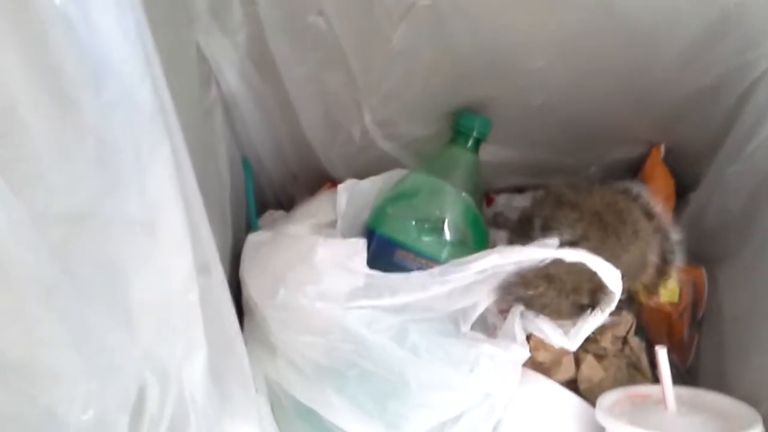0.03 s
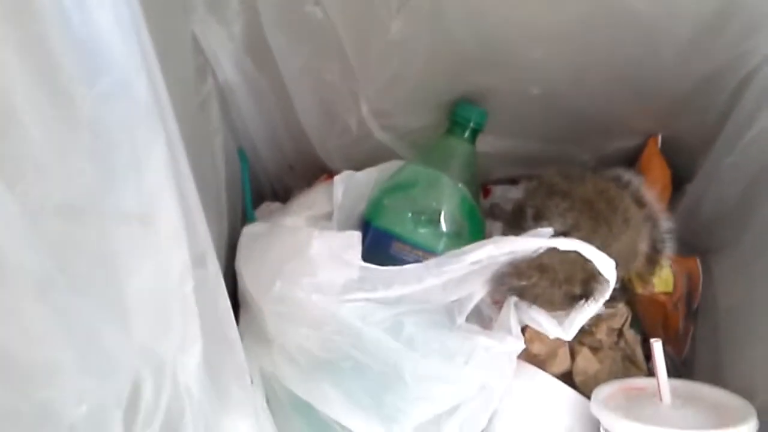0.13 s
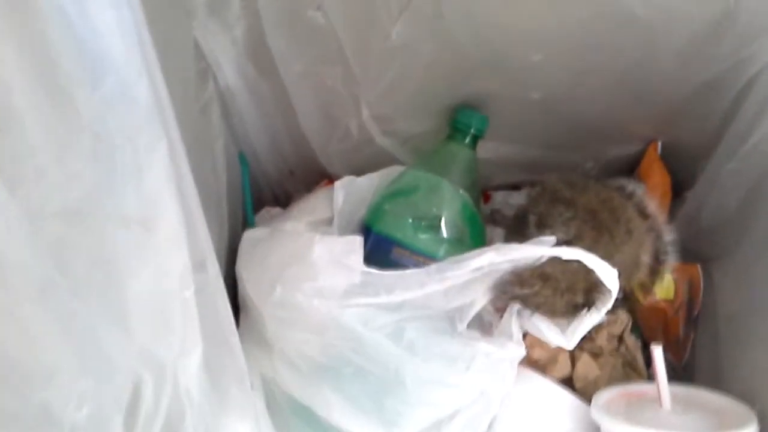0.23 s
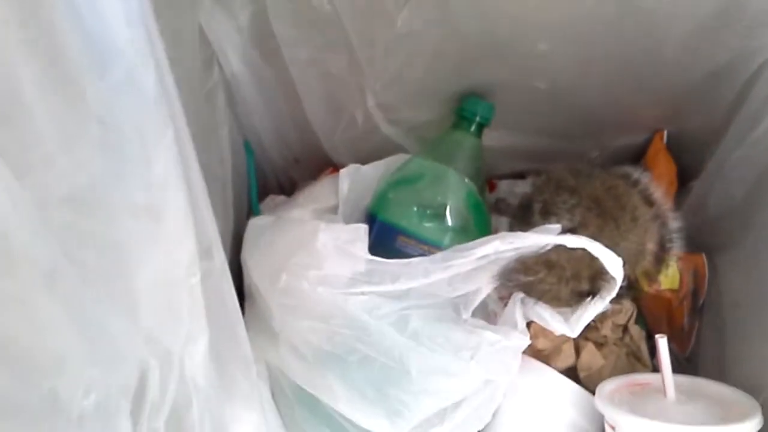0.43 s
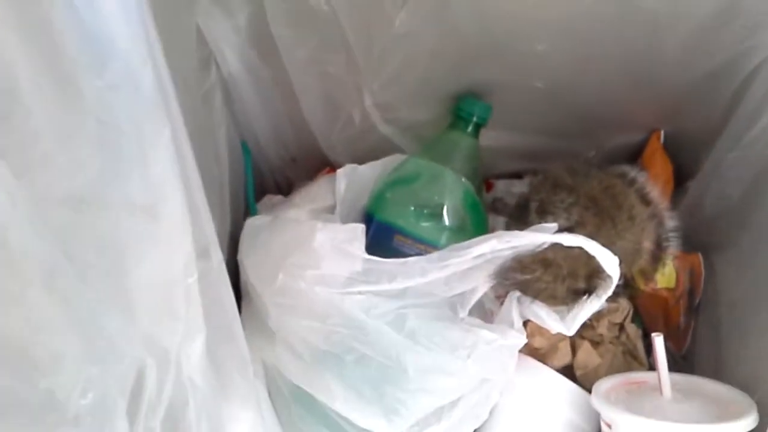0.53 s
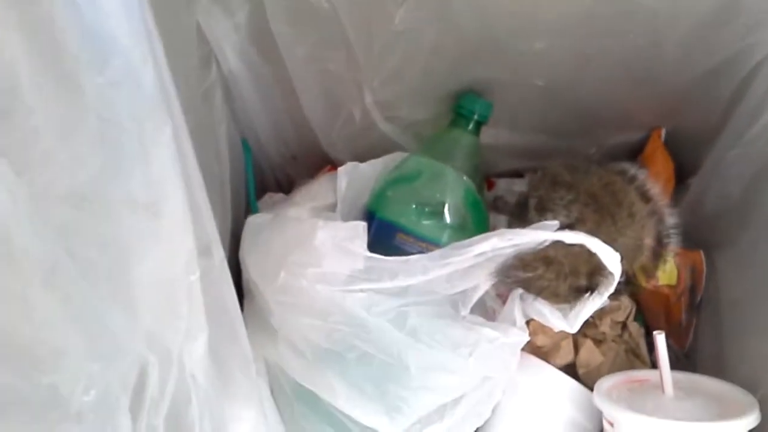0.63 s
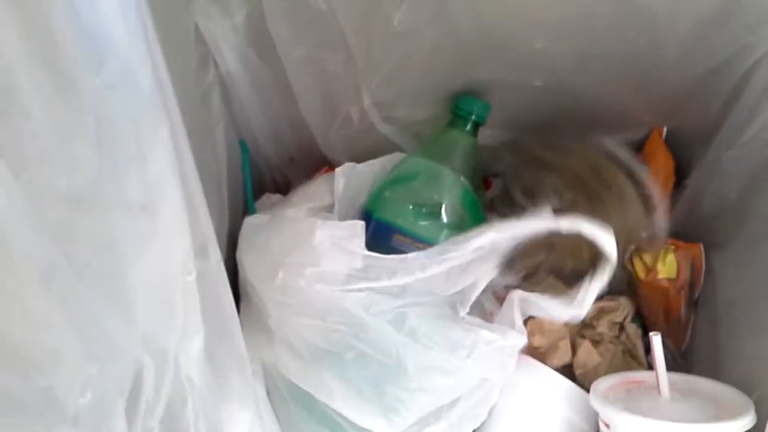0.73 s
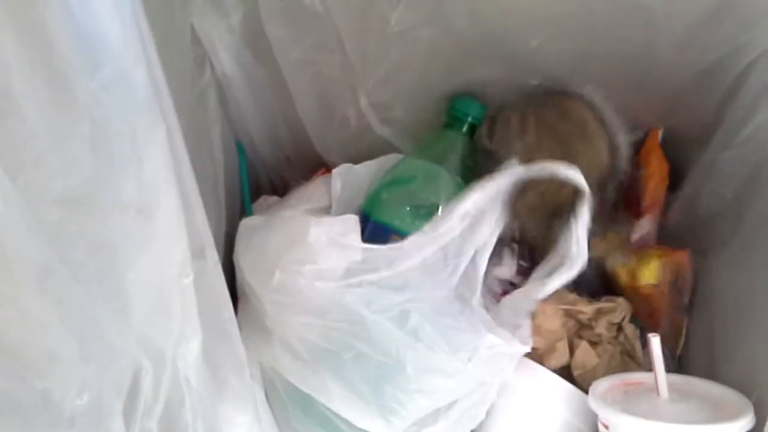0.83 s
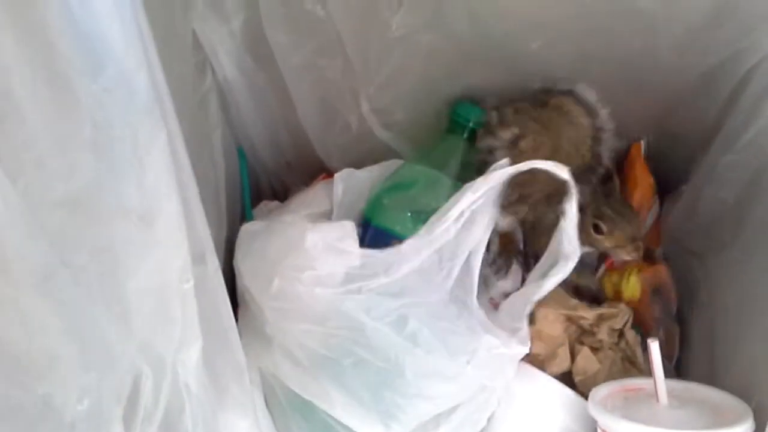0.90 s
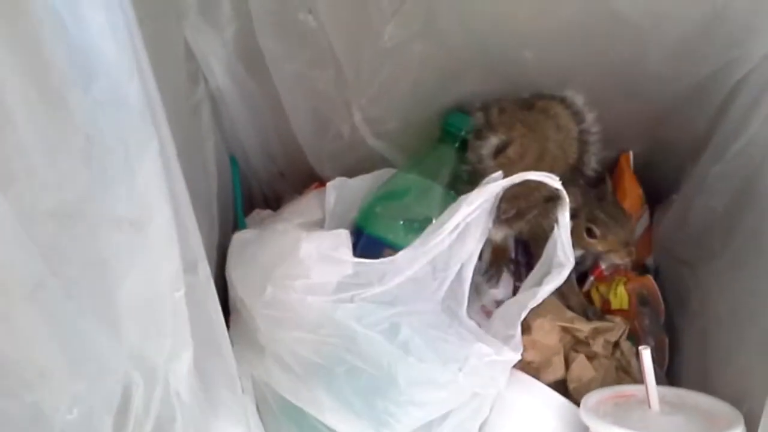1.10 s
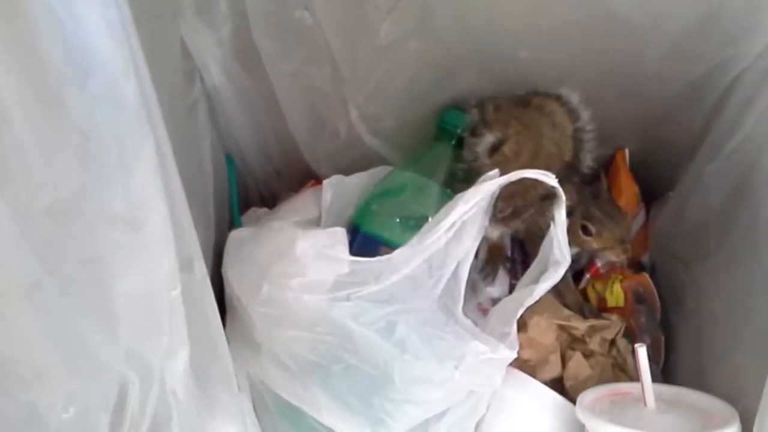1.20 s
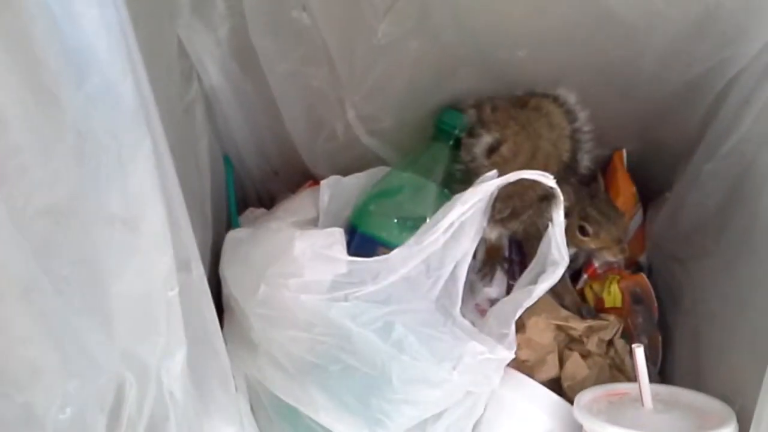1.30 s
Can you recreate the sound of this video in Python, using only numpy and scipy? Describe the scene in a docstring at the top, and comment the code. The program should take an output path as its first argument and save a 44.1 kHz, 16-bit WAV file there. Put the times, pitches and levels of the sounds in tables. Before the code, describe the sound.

Trash knocks in a bin, then ticks and plastic bag crinkling as a squirrel rummages.

```python
"""A squirrel rummaging in a lined rubbish bin, outdoors; one microphone just above the rim.
After a few faint taps, trash drops against the bin with a clattering knock that overloads the microphone.
Claws and settling scraps tick on the hard plastic. Then the animal climbs through a thin plastic bag,
whose creases crinkle and folds snap; two faint squeaks sound as the rustle dies.
Throughout, the bin's hollow colours everything, over faint outdoor noise."""
import sys
import numpy as np
from scipy import signal
from scipy.fft import rfft, irfft
from scipy.io import wavfile

SR = 44100
rng = np.random.default_rng(int(sys.argv[2]) if len(sys.argv) > 2 else 0)


def inscribe(sig):
    """Save sig as 16-bit PCM at rate SR to the path in sys.argv[1].

    A 1-D sig is mono; a 2-D sig holds one channel per row.
    Samples are clipped to [-1, 1] before scaling.
    """
    pcm = np.round(np.clip(np.atleast_2d(sig).T, -1, 1) * 32767)
    wavfile.write(sys.argv[1], SR, pcm.astype(np.int16))


N = 59535
TIME_S = np.arange(N) / SR
BANDS_HZ = 31.25 * 2 ** (np.arange(28) / 3)


# blows of trash on the bin: start_s, boom_db, body_db, crack_db, splinter_db, ring_length_ratio
BLOWS = [(0.21, -13.5, -46, -64, -66, 0.88), (.218, -23, -21, -19, -22, .8),
         (0.2209, -5.5, -10.5, -14, -5.5, 0.72), (0.2261, -12.5, -5, -6, -8, 1.14),
         (.240, -18, -29, -18, -9, 0.76), (0.2528, -21, -26, -11, -9, 0.85),
         (0.2684, -15, -25, -46, -17, 0.7), (.280, -20, -17, -19, -25.5, 0.75),
         (0.31, -35, -52, -20, -37, 1.47), (.327, -26, -48, -48, -54, .9),
         (0.339, -17.5, -12.5, -35, -40, 0.46), (0.371, -19, -31.5, -43, -60, 0.61),
         (.401, -25.5, -27.5, -44.5, -46, 0.91)]
# tone of a blow: band_hz, level_db
BLOW_COLOUR = [(30, -39), (60, -22), (115, -1.5), (200, -5.5), (400, -5.5), (900, -2), (1800, 3),
               (2700, -4), (4400, -3), (7500, 0.5), (11000, -11.5), (16000, -19)]
# decay of its echoes: band_hz, t60_s
BLOW_DECAY = [(60, 0.64), (130, 0.15), (300, 0.36), (900, 0.23), (1700, 0.097), (2700, .17), (5000, 0.11),
              (14000, 0.1)]

def trash_knock():
    """Trash drops against the bin: a soft push, then a cluster of blows and damped bounces."""
    blows = np.array(BLOWS)
    return bin_hits(blows[:, :-1], (130, 900, 2600, 8000), BLOW_COLOUR, BLOW_DECAY,
                    attack_s=0.0014, ring_lengths=blows[:, -1])


# taps on hard plastic: start_s, hollow_db, body_db, snap_db, fizz_db, ring_pitch_hz, ring_db
TAPS = [(.046, -38, -53, -55, -48, 167.3, -29.5), (.097, -38.5, -50, -52, -45, 114.3, -34.5),
        (0.1512, -76, -38.5, -41.5, -36, 4100, -42), (.174, -44, -54, -43, -37, 4200, -43),
        (.196, -52, -65, -54, -37, 4100, -38), (.434, -29, -39, -43, -50, 5600, -38.5),
        (0.444, -39, -32, -46, -55, 2700, -32), (0.5101, -32, -25, -28.5, -36, 4370, -26),
        (0.5787, -28, -32, -54, -34, 6800, -45), (0.6168, -45, -35, -31.5, -40, 5770, -32.5),
        (0.62, -53, -27, -70, -62, 972, -20.5), (0.6512, -37, -29, -44, -57, 6370, -44),
        (.806, -47, -56, -26.5, -50, 4150, -26), (0.836, -37.5, -42, -58, -46, 1515, -29),
        (0.924, -42, -56, -44, -44, 936, -29), (1.192, -52, -52, -45, -39, 1500, -45),
        (1.23, -54.5, -56, -54.5, -45, 7400, -66), (1.285, -78, -45, -47.5, -45, 2300, -50),
        (1.3315, -74, -56, -48, -47.5, 2930, -45)]
# tone of a tap: band_hz, level_db
TAP_COLOUR = [(30, -29), (100, -14.5), (250, -2), (900, 0), (1700, 2), (3000, 4.5), (8000, 5.5),
              (16000, -20.5)]
# decay of its echoes: band_hz, t60_s
TAP_DECAY = [(100, 1), (400, 0.26), (1000, 0.15), (2500, 0.098), (6000, 0.022), (14000, 0.11)]

def ticks():
    """Claws and scraps tap inside the bin; each tapped thing adds a short ring of its own."""
    attack_s, ring_width = 0.00089, 0.031  # width as a share of the pitch
    out = bin_hits([row[:5] for row in TAPS], (250, 1000, 4500, 10000), TAP_COLOUR, TAP_DECAY, attack_s)
    for start_s, *_, pitch_hz, ring_db in TAPS:
        resonance_db = lambda hz: -20 * np.log10(1 + ((hz / pitch_hz - 1) / ring_width) ** 2)
        ring = unit(shaped(rng.standard_normal(N), resonance_db))
        out += undb(ring_db) * ring * fade(start_s, attack_s, t60_s=0.06)
    return out


# modes of the bin, rung by every hit: pitch_hz, level_db
BIN_RESONANCES = [(58, 6), (84, 4.5), (110, 2.5), (131, 0), (178, 1), (232, -10), (321, 1.5), (452, 2),
                  (470, 0), (581, -23), (785, 0), (982, -4.5), (1190, -5.5), (1235, -8.5), (1320, -9)]

def bin_hits(rows, columns_hz, colour, decay, attack_s, ring_lengths=1):
    """Each hit (a start, then levels at columns_hz) is a brief contact, echoes and the bin's ringing."""
    starts_s = np.array(rows)[:, :1]
    ring_lengths = np.reshape(ring_lengths, (-1, 1))
    contacts = undb(1) * fade(starts_s, attack_s, t60_s=0.029)
    rings = fade(starts_s, attack_s, t60_s=ring_lengths * 0.33)

    def summed_envelope(hz, envelopes):
        """Overlapping hits add in power, each at its own level for this frequency."""
        gains = undb([at(hz, list(zip(columns_hz, levels_db))) for _, *levels_db in rows])
        return undb(at(hz, colour)) * np.sqrt(gains ** 2 @ envelopes ** 2)

    out = np.zeros(N)
    for hz in BANDS_HZ:
        echoes = fade(starts_s, attack_s, ring_lengths * at(hz, decay))
        out += summed_envelope(hz, np.hypot(contacts, echoes)) * noise(hz)
    for hz, level_db in BIN_RESONANCES:
        mode = np.sin(2 * np.pi * (hz * TIME_S + rng.random()))
        out += undb(level_db - 3) * summed_envelope(hz, rings) * mode
    return out / 2


# how hard the squirrel moves the bag: time_s, level_db
BAG_MOVEMENT = [(0, -44), (0.048, -56), (0.129, -40.5), (.2, -46.5), (.3, -52), (.64, -59.5), (.69, -31.5),
                (0.723, -28.5), (0.738, -33.5), (0.763, -23), (.805, -31.5), (.825, -26.5), (.855, -31),
                (0.881, -23), (0.907, -32), (0.936, -27.5), (.975, -39.5), (1.01, -28), (1.029, -41.5),
                (1.11, -36.5), (1.15, -51.5), (1.35, -59.5)]
# tone of the plastic film: band_hz, level_db
FILM_COLOUR = [(40, -40), (100, -25.5), (200, -16.5), (400, -11), (550, -17.5), (800, -4), (1100, -2),
               (1800, 1.5), (3000, -1), (4200, 0), (5600, -2.5), (8000, 6), (11000, 1), (16000, -6.5)]

def crinkle():
    """Thousands of tiny creases buckle, each click smeared by echoes off the bin's walls."""
    creases_per_s, spread_db = 3000, 3
    effort = undb(np.interp(TIME_S, *np.array(BAG_MOVEMENT).T))
    sizes = undb(spread_db * np.minimum(rng.exponential(size=N), 4))
    signs = rng.choice([-1, 1], N)
    creases = sizes * signs * (rng.random(N) < creases_per_s / SR)
    echo_power = signal.fftconvolve(creases ** 2, fade(0, attack_s=0.001, t60_s=0.018) ** 2)[:N]
    echo = np.sqrt(np.abs(echo_power)) * rng.standard_normal(N)
    clicks = unit(creases) + undb(-0.5) * unit(echo)
    rustle = shaped(clicks, lambda hz: at(hz, FILM_COLOUR) - 10 * np.log10(hz))  # per band to per hertz
    return undb(1.5) * effort * unit(rustle)


# larger folds snapping over, some with a footfall: start_s, footfall_db, body_db, snap_db
FOLD_SNAPS = [(.723, -23.5, -23.5, -41), (.7615, -31, -35, -34), (.767, -28, -28, -24),
              (.7896, -21, -43, -28.5), (.829, -47, -47, -30), (.874, -14, -32, -56),
              (.9165, -15.5, -28, -31), (.9926, -16.5, -37, -24), (1.0321, -40, -43, -35),
              (1.0839, -25, -52, -27), (1.103, -40, -47, -42)]
# decay of their echoes: band_hz, t60_s
FOLD_DECAY = [(200, 0.12), (1000, 0.22), (4000, 0.09), (14000, 0.017)]
# resonances of the stretched film: centre_hz, width_hz, gain_db
FILM_PEAKS = [(4140, 290, 4), (7270, 250, 2.5)]

def bag():
    """Larger folds snap amid the crinkle as the squirrel climbs; the stretched film colours both."""
    creases = crinkle()
    folds = bin_hits(FOLD_SNAPS, (300, 1200, 7000), FILM_COLOUR, FOLD_DECAY, attack_s=0.0008)
    return shaped(creases + folds, lambda hz: bumps(hz, FILM_PEAKS))


# faint squeaks as the rustle dies: middle_s, length_s, pitch_hz, level_db
THIN_SQUEAKS = [(1.166, 0.037, 2700, -50), (1.277, 0.048, 2287, -53)]

def squeaks():
    """Thin, pure tones that swell and fade."""
    out = np.zeros(N)
    for middle_s, length_s, pitch_hz, level_db in THIN_SQUEAKS:
        swell = np.exp(-(2 * (TIME_S - middle_s) / length_s) ** 2)
        out += undb(level_db) * swell * np.sin(2 * np.pi * pitch_hz * TIME_S)
    return out


# outdoor ambience at the rim: band_hz, level_db
AMBIENCE = [(25, -66), (60, -9), (110, -12.5), (170, -2), (250, 1), (400, -4.5), (700, -11.5), (1500, -8.5),
            (3000, -12), (8000, -25), (16000, -22)]

def outdoors():
    """Faint steady noise, humming in the hollow of the bin."""
    return undb(-47.5) * sum(undb(at(hz, AMBIENCE)) * noise(hz) for hz in BANDS_HZ)


def undb(db):
    """Decibels to gain."""
    return 10 ** (np.asarray(db) / 20)


def at(hz, points):
    """Read (frequency_hz, value) points on a log-frequency axis."""
    points_hz, values = np.array(points, float).T
    return np.interp(np.log(hz), np.log(points_hz), values)


def unit(x):
    """Scale to rms 1."""
    return x / np.sqrt(np.mean(x ** 2))


def noise(hz):
    """Third-octave noise of rms 1."""
    edge = 2 ** (1 / 6)
    bandpass = signal.butter(2, [hz / edge, hz * edge], "band", fs=SR, output="sos")
    return unit(signal.sosfilt(bandpass, rng.standard_normal(N)))


def fade(start_s, attack_s, t60_s):
    """A quick rise and an exponential decay."""
    age_s = np.maximum(TIME_S - start_s, 0)
    return np.minimum(age_s / attack_s, 1) * np.exp(-np.log(1000) * age_s / t60_s)


def shaped(x, gain_db):
    """Filter by a function that gives dB for each frequency."""
    hz = np.maximum(np.arange(N + 1) * SR / (2 * N), 1)
    return irfft(rfft(x, 2 * N) * undb(gain_db(hz)))[:N]


def bumps(hz, rows):
    """Bell-shaped peaks or dips, in dB."""
    return sum(db * np.exp(-((hz - centre) / width) ** 2) for centre, width, db in rows)


# dips where the bin's echoes cancel: centre_hz, width_hz, gain_db
HOLLOW_DIPS = [(387, 26, -2.5), (1650, 300, -2.5)]

def scene():
    """Everything as it arrives just above the rim, coloured by the bin's hollow, in mono."""
    mix = trash_knock() + ticks() + bag() + squeaks() + outdoors()
    return shaped(mix, lambda hz: bumps(hz, HOLLOW_DIPS))[None]


def record(dry):
    """The deepest rumble is removed; the close microphone flattens the loudest peaks and cuts the top."""
    rumble_hz, top_hz = 43.8, 15700
    ceiling, knee = 0.72, 6
    low_cut = signal.butter(4, rumble_hz, "high", fs=SR, output="sos")
    high_cut = signal.ellip(10, 0.2, 80, top_hz, fs=SR, output="sos")
    trimmed = signal.sosfilt(low_cut, dry)
    clipped = trimmed / (4.5 + np.abs(trimmed / ceiling) ** knee) ** (1 / knee)
    return signal.sosfilt(high_cut, clipped)


dry = scene()
out = record(dry)
inscribe(out)
```